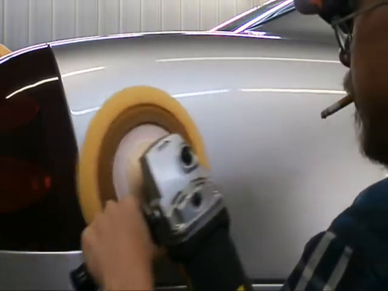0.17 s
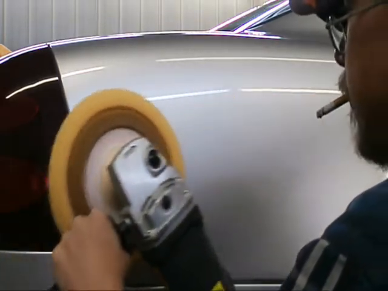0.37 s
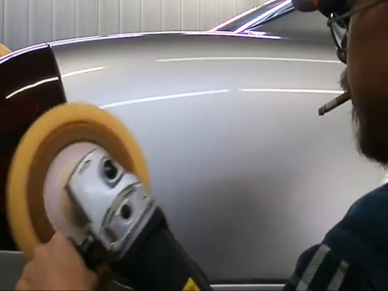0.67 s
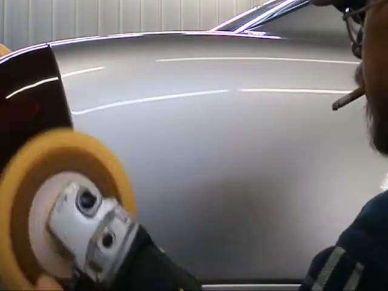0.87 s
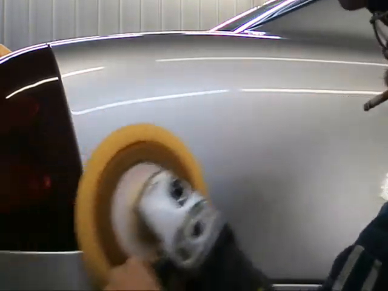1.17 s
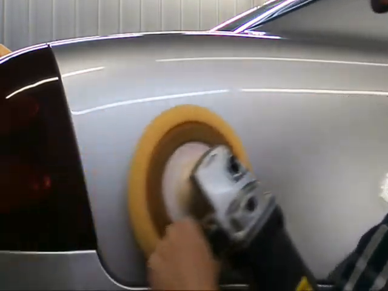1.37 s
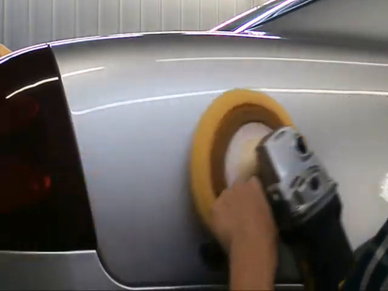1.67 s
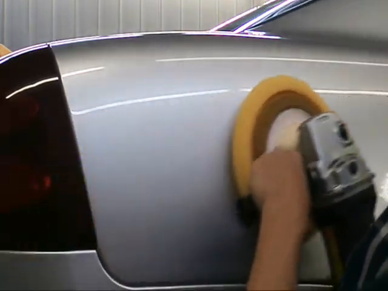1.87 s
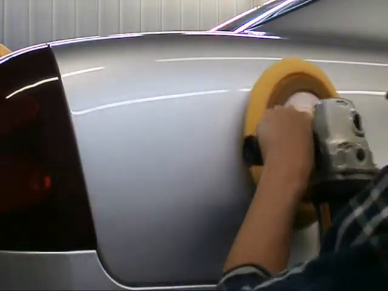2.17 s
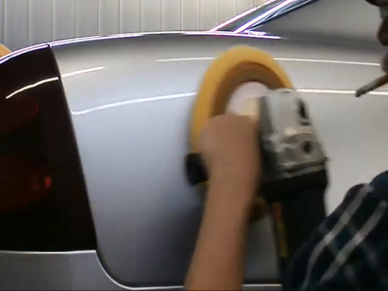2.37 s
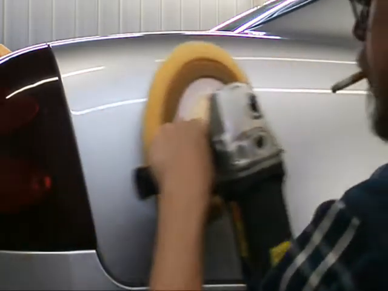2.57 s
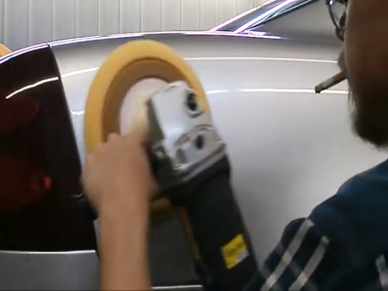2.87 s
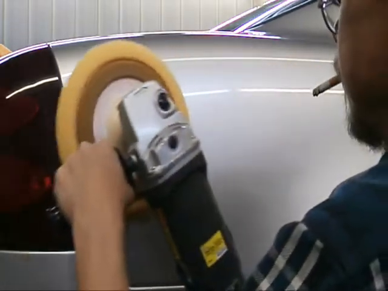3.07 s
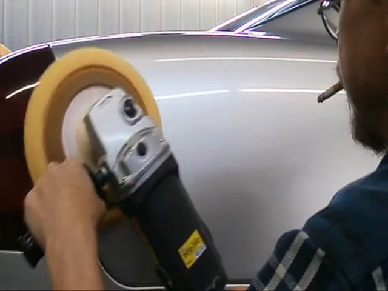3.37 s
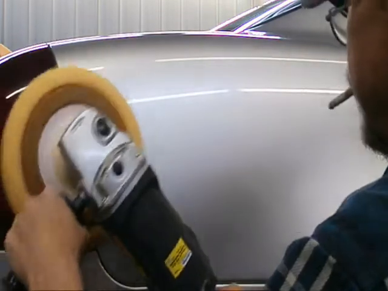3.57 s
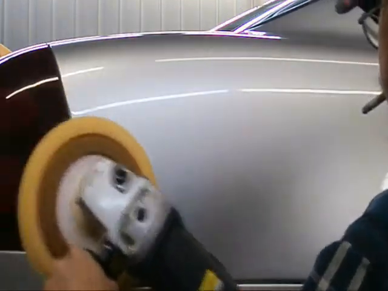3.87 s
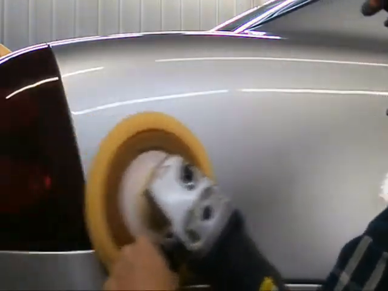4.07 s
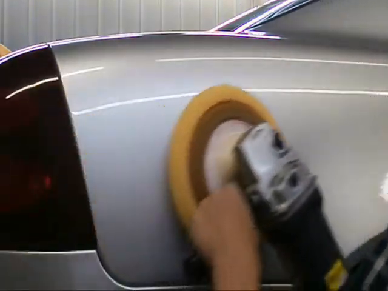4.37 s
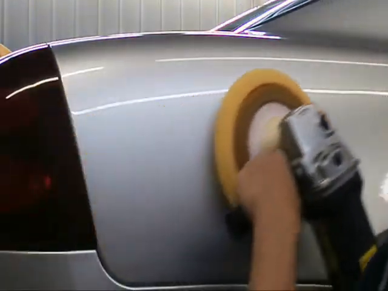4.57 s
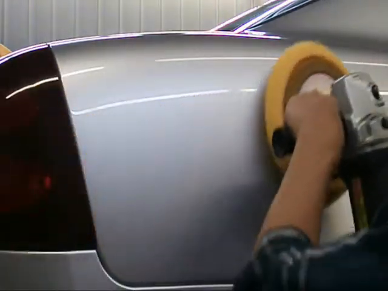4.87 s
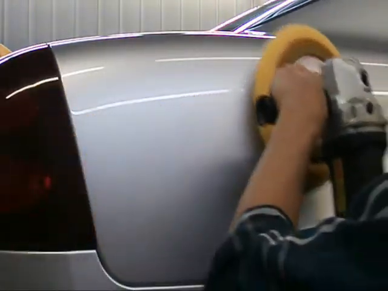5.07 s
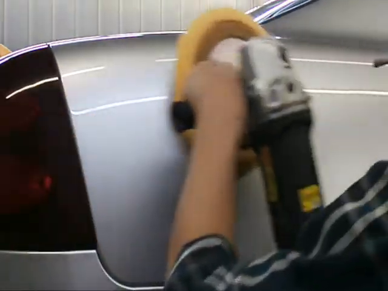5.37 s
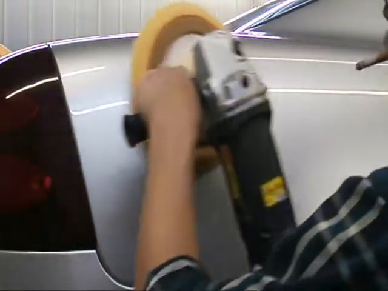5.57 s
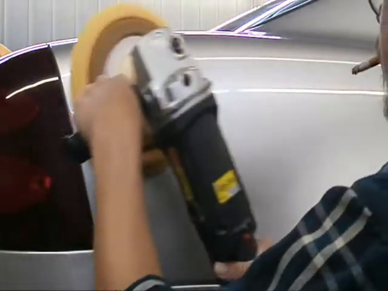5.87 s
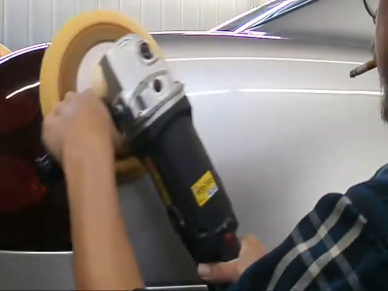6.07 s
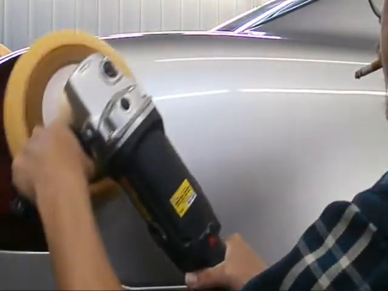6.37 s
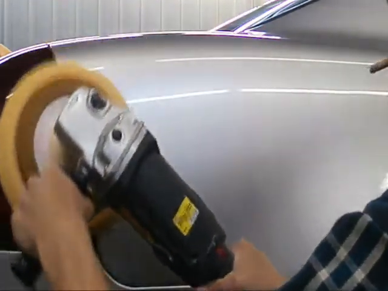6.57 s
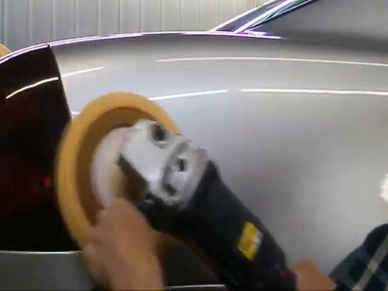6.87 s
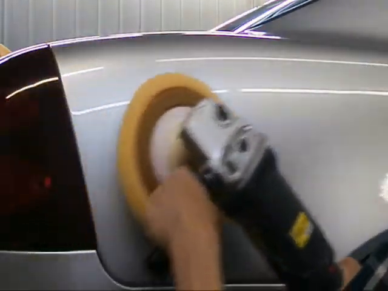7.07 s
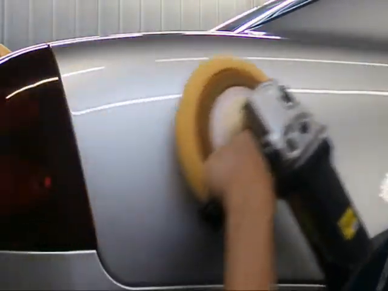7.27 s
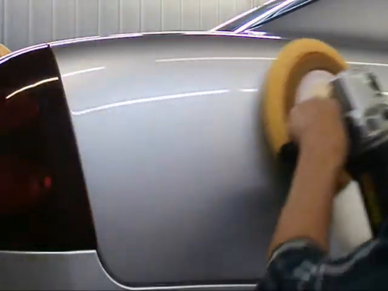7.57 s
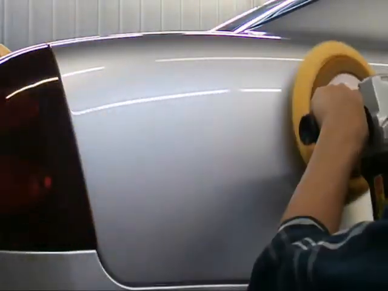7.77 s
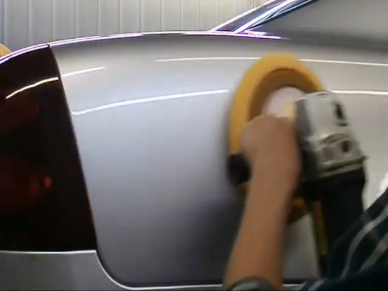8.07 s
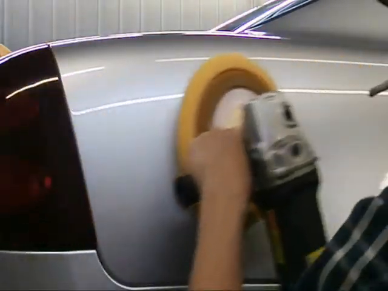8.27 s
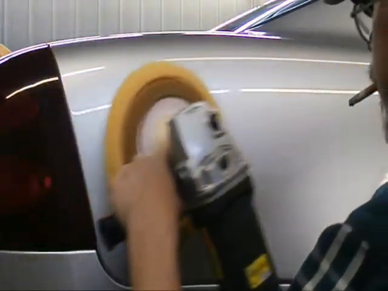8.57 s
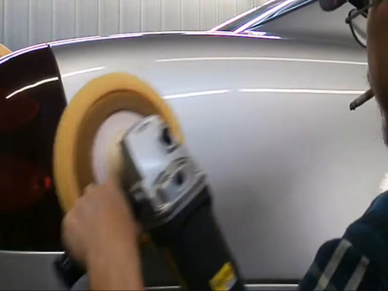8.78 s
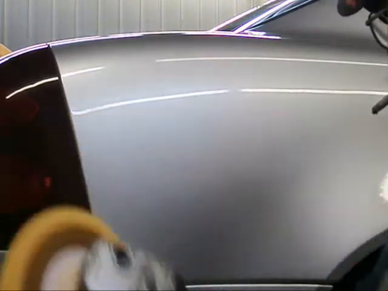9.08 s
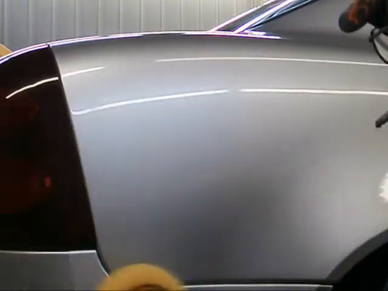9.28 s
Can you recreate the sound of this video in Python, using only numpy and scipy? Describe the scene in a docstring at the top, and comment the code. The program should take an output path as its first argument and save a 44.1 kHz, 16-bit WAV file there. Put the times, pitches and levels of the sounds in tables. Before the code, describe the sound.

From 0 s an electric rotary polisher is already at full running speed, close to a single microphone in a garage. A dense, rough rush of fan air and rubbing pad mixes with gritty gear rattle and a nasal metallic whine near 1.25-1.3 kHz, with shimmering higher overtones. A quick throb of about two dozen soft thuds a second makes it flutter. As the pad laps the car panel, pitch and colour drift: rising slightly around 2 s, sagging by 3-4 s, up near 5 s, lowest and most strained around 6 s, then climbing to its highest near 7.8 s before easing down again. Faint mains buzz and low room rumble lie beneath. At about 9 s the switch is released; the whine drops quickly at first, then glides smoothly downward, its overtones ringing, while the air rush persists. It is still turning when the sound ends at about 9.4 s.

```python
"""In a garage, near one microphone, a rotary polisher already laps over a car panel as the scene opens.
A 6-tooth pinion on the armature drives a 53-tooth wheel on the pad spindle: the mesh whines and uneven
teeth knock in patterns that repeat with each shaft, amid the rush of air and pad, mains hum and room rumble.
A high spot thuds once a wheel turn, and each lap of the pad changes speed and tone.
At 8.97 s the tool is switched off and the whine glides down, still turning when the scene ends."""
import sys
import numpy as np
from scipy import signal
from scipy.fft import rfft, irfft, next_fast_len
from scipy.io import wavfile
from scipy.ndimage import uniform_filter1d, map_coordinates

SR = 44100
rng = np.random.default_rng(int(sys.argv[2]) if len(sys.argv) > 2 else 0)


def volts(x):
    """Linear amplitude factor 10**(x/20) for a level x in dB, scalar or array-like."""
    e = np.asarray(x, float) / 20
    return 10 ** e


def materialize(psi):
    """Save the field psi as 16-bit PCM at rate SR to the path in sys.argv[1].

    A 1-D psi becomes a single channel; in a 2-D psi each row is a channel.
    """
    bounded = np.clip(np.atleast_2d(psi).T, -1, 1)
    quanta = np.round(bounded * 32767).astype(np.int16)
    wavfile.write(sys.argv[1], SR, quanta)


N = 415863
TIME = np.arange(N) / SR  # [s]

PINION_TEETH, WHEEL_TEETH = 6, 53
SPOT_TOOTH = 12  # wheel tooth at the high spot
OFF_S = 8.97  # the switch opens
IDLE_TEETH, FULL_LOAD_DROP = 1315, 100  # unloaded speed, speed lost at load 1 [teeth/s]
SLACK_TEETH, SLACK_S = 32, .05  # quick first loss of speed [teeth/s] and its time constant [s]
COAST_S = 2  # time constant of the slow run-down [s]
TOP_HZ = 15750  # upper limit of the microphone's band

# Motor speed as pressing on the pad slows it, before any run-down: (time [s], speed [teeth/s])
DRIVEN_SPEED = [(0.0, 1275.5), (0.62, 1263.7), (0.96, 1279.4), (1.14, 1279.5), (1.55, 1296.6),
                (2.14, 1310.2), (2.42, 1290.4), (2.9, 1269.9), (3.2, 1253.7), (3.8, 1249.0), (4.2, 1272.0),
                (4.75, 1280.4), (5.06, 1290.4), (5.45, 1244.1), (6.15, 1206.7), (6.72, 1229.8),
                (7.02, 1241.4), (7.5, 1283.0), (7.82, 1316.7), (8.2, 1280.4), (8.8, 1239.3), (8.97, 1246.1)]
# Moments when the pad passes the right end of its oval lap, then rises: (time [s])
LAP_RIGHT_END_S = [-0.28, 2.5, 5, 8, 10]
# Rush level and its additions in two ranges:
# (time [s], level [dB], added between 2.3 and 3.8 kHz [dB], added between 3.8 and 12.6 kHz [dB])
RUSH_LEVEL = [(0, -23.5, 0.5, -1.5), (.5, -25, 1.5, 1), (.8, -25.5, -1.5, 1), (1.5, -25, 2.5, -1),
              (2, -26, -2, -0.5), (2.22, -24.5, -5, 0.5), (2.5, -24, 1.5, 0), (2.8, -24.5, 4, -1.5),
              (3.05, -25.5, -2.5, -1), (3.75, -26, -3, 1.5), (4.3, -24, -2, -3), (4.75, -24.5, 0.5, -0.5),
              (5.1, -24.5, -4, 1), (5.5, -25.5, -2.5, -0.5), (5.9, -26, -5, -2), (6.2, -26.5, -7, -2.5),
              (6.45, -25, -4, -0.5), (6.8, -26.5, -6, -2.5), (7.25, -25, 2.5, -1.5), (7.67, -25, -4, -0.5),
              (8.15, -23, -1.5, 0), (8.85, -24.5, -0.5, -0.5), (9.1, -26, -4, -1), (9.43, -23.5, -10, -4)]
# Which addition each of the six parts takes: (weight of the first [0-1], weight of the second [0-1])
RUSH_SHARE = [(0, 0), (0, 0), (1, 0), (0, 1), (0, 1), (0, 0)]
# Level laws about the rush, rows: panel drone, gear case low, gear case high, vents, fan air, brush hiss:
# (base [dB], added at the lap's right end [dB], at its top [dB], at load 1 [dB], after the switch [dB])
PART_LAWS = [(1, 0, 0.28, -3, -0.5), (2, -1, 0.049, 0.5, -6), (-1, -1.5, -0.045, -1.5, -4),
             (0.5, 0.5, -0.86, 0.5, 0), (-11, -.5, -0.59, 0.5, 2.5), (-10, -4, 0.61, 0, 1)]
# Borders between those six parts: (frequency [Hz])
PART_BORDERS_HZ = [1350, 2300, 3800, 7600, 12600]
# Casing colour below 3300 Hz, only its shape within a part matters: (frequency [Hz], relative density [dB/Hz])
CASING_COLOUR = [(76, -47), (130, -20.5), (161, -21), (229, -15), (335, -14.5), (808, -3.5), (912, -6),
                 (1230, -5), (1550, -12.5), (2480, 4), (2880, 7.5), (3300, -0.5), (4290, -40), (7260, -120)]
# Vent colour from 3300 Hz up, likewise a shape: (frequency [Hz], relative density [dB/Hz])
VENT_COLOUR = [(3300, 8), (3960, 2), (4200, -1.5), (4550, -8.5), (5010, -4.5), (6300, -7), (7560, -14.5),
               (8200, -19.5), (10100, -22.5), (11200, -20.5), (12400, -23.5), (13300, -20), (13800, -11),
               (15700, -13)]
# Knocks of the wheel's teeth over the rush: (frequency [Hz], level [dB])
WHEEL_KNOCKS = [(300, -8), (900, -2.5), (1200, 1.5), (1600, -4), (2500, 1.5), (3200, -4), (7000, -12)]
# Knocks of the pinion's teeth over the rush: (frequency [Hz], level [dB])
PINION_KNOCKS = [(500, -12), (2000, -7), (5000, -6), (9000, -6), (14000, -7)]
# Throb of each part with the spindle: (part [0-5], times a turn, depth [0-1], tooth at the peak)
SPINDLE_THROB = [(0, 1, .11, 17), (0, 2, .05, 15), (1, 4, .14, 11.5), (1, 2, .06, 10), (2, 1, .17, 47),
                 (2, 2, .1, 17), (2, 4, .08, 9), (3, 2, .04, 11)]
# Resonance between tool and panel: (time [s], frequency [Hz])
PANEL_RIDGE = [(0, 2510), (.26, 2330), (1.4, 2750), (2.26, 2930), (2.78, 2400), (3.73, 2430), (4.28, 2770),
               (5, 2640), (6.33, 2010), (7.3, 2720), (7.77, 2780), (8.51, 2550), (8.93, 2720), (9.43, 2150)]
# Armature tones at one and four times a turn, a row each:
# (base [dB], added at the lap's right end [dB], at its top [dB], at load 1 [dB], after the switch [dB])
ARMATURE_LAWS = [(-46, 4, 3, -8, 6), (-49, 2, 0, 10, -8)]
# Mesh tone and its octave before swell and flicker: (time [s], mesh level [dB], octave level [dB])
MESH_LEVEL = [(0, -41, -38), (.2, -28, -38), (.45, -24, -27), (.7, -28, -30), (.96, -31, -26),
              (1.12, -32, -35), (1.36, -31, -26), (1.65, -30, -35), (1.9, -38, -31), (2.08, -43, -22),
              (2.3, -44, -19), (2.38, -24, -23), (2.6, -25, -28), (2.72, -27, -35), (2.88, -24, -22),
              (3.2, -28, -28), (3.5, -28, -29), (3.9, -31, -32), (4.16, -26, -22), (4.45, -34, -38),
              (4.75, -46, -24), (5.2, -33, -25), (5.4, -31, -19), (5.5, -24, -18), (5.65, -24, -19.5),
              (5.8, -27, -18), (6.1, -25, -20), (6.25, -24.5, -23), (6.4, -26, -26), (6.62, -24.5, -21),
              (7.1, -28, -26), (7.36, -31, -38), (7.65, -47, -25), (8.1, -33, -28), (8.32, -30, -21),
              (8.5, -28, -32), (8.75, -33, -26), (8.93, -29, -30), (9.03, -31, -21), (9.12, -50, -23),
              (9.22, -42, -22), (9.29, -39, -27), (9.36, -33, -22), (9.43, -34, -30)]
# Third multiple of the mesh, likewise: (time [s], level [dB])
THIRD_LEVEL = [(0, -47), (.3, -27.5), (.65, -43), (.95, -27), (1.2, -33), (1.45, -33), (1.8, -42),
               (2.05, -31), (2.3, -30), (2.5, -48), (3.05, -42), (3.35, -44), (4.15, -35), (4.5, -46),
               (5.3, -39), (5.6, -46), (6.55, -37), (6.9, -48), (7.35, -34), (7.55, -43), (8, -33),
               (8.3, -48), (8.5, -33), (9.05, -50), (9.43, -50)]
# Fourth multiple of the mesh, likewise: (time [s], level [dB])
FOURTH_LEVEL = [(0, -47), (.5, -40), (1.2, -47), (2.2, -48), (2.45, -37), (2.65, -43), (2.9, -34),
                (3.2, -37), (4, -36), (4.25, -48), (5.55, -46), (5.8, -38), (6.3, -42), (6.85, -35),
                (7.25, -33), (7.55, -44), (8.1, -42), (8.4, -32), (8.85, -39), (9.05, -52), (9.43, -44)]
# Fifth and sixth multiples: (multiple of the mesh, law with the armature rows' five columns [dB])
OVERTONE_LAWS = [(5, (-43.5, 9, -1, -8, 0)), (6, (-43.5, 1.5, -0.5, 3, -1.5))]
# Faint higher multiples while driven: (multiple of the mesh, middle level [dB rms])
UPPER_TONES = [(7, -54), (8, -55), (9, -57), (10, -62), (11, -59), (12, -57)]
# Ring that the sixth multiple glides through after the switch: (frequency [Hz], added level [dB])
GLIDE_RING = [(5750, 19), (5950, 21), (6150, 6), (6300, 4), (6650, 12), (6900, 8), (7200, -3)]
# Buzz at multiples of twice the mains: (frequency [Hz], middle level [dB rms])
MAINS_BUZZ = [(120, -54.5), (240, -51), (360, -56), (480, -45.5)]
# Colour of the room's rumble, only its shape matters: (frequency [Hz], relative density [dB/Hz])
GARAGE_COLOUR = [(30, -16), (50, -8), (80, 5.5), (110, -1.5), (160, -14), (300, -48)]
# Level of the high spot's thuds: (time [s], level [dB])
THUD_LEVEL = [(0, -28), (1.1, -32), (1.55, -38), (2.3, -37), (2.7, -30), (4.1, -32), (4.6, -37),
              (5.65, -35), (6.05, -50), (6.4, -50), (6.8, -36), (7.55, -42), (8.4, -31), (8.7, -31),
              (9.1, -40)]


def unit(x):
    """Brings a layer to rms 1."""
    return x / np.sqrt(np.mean(x ** 2) + 1e-20)


def along(points, hz):
    """Interpolates (Hz, value) points on a log axis."""
    f, v = np.transpose(points)
    return np.interp(np.log(hz + 1), np.log(f + 1), v)


def curves(rows):
    """One value per sample for each column after the time."""
    s, *cols = np.transpose(rows)
    return [np.interp(TIME, s, c) for c in cols]


def wobble(rate):
    """A smooth random curve, rate knots a second."""
    coarse = TIME[::32]
    knots = rng.standard_normal(500)
    return np.interp(TIME, coarse, map_coordinates(knots, [coarse * rate]))


def filtered(x, response):
    """x times a complex response of frequency."""
    m = next_fast_len(N + SR // 2)
    spectrum = rfft(x, m) * response(np.fft.rfftfreq(m, 1 / SR))
    return irfft(spectrum, m)[..., :N]


def motor_speed():
    """Teeth a second: set by the load while driven, dying away after the switch."""
    since_off = np.clip(TIME - OFF_S, 0, None)
    slack = SLACK_TEETH * (1 - np.exp(-since_off / SLACK_S))
    return (curves(DRIVEN_SPEED)[0] - slack) * np.exp(-since_off / COAST_S)


def handling():
    """Rows that the level laws weigh: one, how far right, how high, load, switched off."""
    lap = 2 * np.pi * np.interp(TIME, LAP_RIGHT_END_S, np.arange(len(LAP_RIGHT_END_S)))
    load = (IDLE_TEETH - curves(DRIVEN_SPEED)[0]) / FULL_LOAD_DROP
    off = np.clip((TIME - OFF_S) / 0.16, 0, 1)
    return np.array([np.ones(N), np.cos(lap), np.sin(lap), load, off])


def knocks(teeth_passed, count, memory_turns, jitter):
    """One knock per tooth; each tooth keeps its own size, which drifts over some turns."""
    tooth = np.arange(1, int(teeth_passed[-1]))
    sizes = rng.standard_normal((2000, count))
    size = map_coordinates(sizes, [tooth / count / memory_turns, tooth % count], order=1)
    moment = tooth + jitter * rng.standard_normal(len(tooth))
    at = np.interp(moment, teeth_passed, np.arange(N))
    # a windowed sinc sets each knock between samples
    near = np.floor(at)[:, None] + np.arange(-7, 9)
    offset = near - at[:, None]
    kernel = np.sinc(offset) * np.cos(np.pi * offset / 16) ** 2
    index = np.clip(near, 0, N - 1).astype(int)
    return unit(np.bincount(index.ravel(), (size[:, None] * kernel).ravel(), N))


def ringing(x, t60):
    """The metal case and the panel smear each knock in time without colouring it."""
    t = np.arange(SR // 4) / SR
    tail = volts(-60 * t / t60) * rng.standard_normal(len(t))
    phase_only = lambda hz: np.exp(1j * np.angle(rfft(tail, 2 * len(hz) - 1)))
    return filtered(x, phase_only)


def sweeping(x, patchy_db, ridge_db, width_hz):
    """Echoes off the curved panel shift as the tool moves: a ridge slides and bands fade in and out."""
    hz, t, z = signal.stft(x, SR, nperseg=512)
    field = uniform_filter1d(rng.standard_normal(z.shape), size=5, axis=0)
    field = uniform_filter1d(field, size=70, axis=1)
    treble = (hz / (hz + 3000))[:, None]  # short waves are scattered most
    ridge_hz = np.interp(t, *np.transpose(PANEL_RIDGE))
    ridge = np.exp(-((hz[:, None] - ridge_hz) / width_hz) ** 2)
    gain_db = patchy_db * unit(field) * treble + ridge_db * ridge
    return signal.istft(z * volts(gain_db), SR, nperseg=512)[1][:N]


def six_parts(source):
    """Colours the source by casing and vents, then splits it into six overlapping frequency ranges."""
    colour = lambda hz: volts(np.where(hz < 3300, along(CASING_COLOUR, hz), along(VENT_COLOUR, hz) - 11))
    # 0 in the lowest part, 5 in the highest
    place = lambda hz: sum(1 / (1 + (edge / (hz + 1)) ** 12) for edge in PART_BORDERS_HZ)
    parts = np.arange(len(PART_BORDERS_HZ) + 1)[:, None]
    return filtered(source, lambda hz: colour(hz) * np.clip(1 - abs(place(hz) - parts), 0, 1))


def rattle(teeth_passed, hands):
    """Air and pad rush plus tooth knocks, through the casing, in six parts that face the microphone in turn."""
    wheel = knocks(teeth_passed, count=WHEEL_TEETH, memory_turns=15, jitter=.01)
    pinion = knocks(teeth_passed, count=PINION_TEETH, memory_turns=120, jitter=.008)
    teeth = filtered(wheel, lambda hz: volts(along(WHEEL_KNOCKS, hz)))
    teeth += filtered(pinion, lambda hz: volts(along(PINION_KNOCKS, hz)))
    # torque pulses at twice the mains, until the switch opens
    ripple = 1 + 0.019 * (TIME < OFF_S) * np.cos(2 * np.pi * MAINS_BUZZ[0][0] * TIME)
    knocking = ripple * (rng.standard_normal(N) + ringing(teeth, t60=.01))
    fan_air = filtered(rng.standard_normal(N), lambda hz: .8 / (1 + (3500 / (hz + 1)) ** 2))
    source = sweeping(knocking + fan_air, patchy_db=2.5, ridge_db=3.5, width_hz=220)
    split = six_parts(source)
    throb = np.ones(split.shape)
    for part, times, depth, tooth in SPINDLE_THROB:
        throb[part] += depth * np.cos(2 * np.pi * times * (teeth_passed - tooth) / WHEEL_TEETH)
    level_db, *added_db = curves(RUSH_LEVEL)
    parts_db = level_db + np.dot(RUSH_SHARE, added_db) + PART_LAWS @ hands
    return sum(volts(db + 0.55 * wobble(9)) * unit(part) for db, part in zip(parts_db, throb * split))


def armature(teeth_passed, hands):
    """Two sines locked to the armature: its unbalance once a turn, and a tone four times a turn."""
    turn = 2 * np.pi * teeth_passed / PINION_TEETH
    unbalance_db, four_db = ARMATURE_LAWS @ hands
    unbalance = volts(unbalance_db + 1.5 * wobble(5)) * np.sin(turn)
    four_a_turn = volts(four_db + 3 * wobble(4)) * np.sin(4 * turn + .4 * wobble(30))
    return np.sqrt(2) * (unbalance + four_a_turn)


def mesh_whine(teeth_passed, speed, hands):
    """Multiples of the tooth rate; the wheel's runout swells and bends them, less so after the switch."""
    off = hands[-1]
    drive = 1 - .55 * off
    # spindle angle, counted from a tooth
    angle = lambda tooth: 2 * np.pi * (teeth_passed - tooth) / WHEEL_TEETH
    bend = .7 * np.cos(angle(17))  # [rad]
    fundamental_swell = .6 * np.cos(angle(18)) + .12 * np.cos(4 * angle(7.5))
    overtone_swell = .3 * hands[3] ** 2 * np.cos(angle(19))  # grows with the load
    overtone_swell += .15 * np.cos(2 * angle(12)) + .3 * np.cos(4 * angle(8))
    # the fifth and sixth rise and fall with the lap, the load and the switch, and waver at random, less after
    # the switch
    levels_db = {k: law @ hands + 3 * drive * wobble(5) for k, law in OVERTONE_LAWS}
    levels_db[6] += off * along(GLIDE_RING, 6 * speed)
    levels_db.update(zip((1, 2, 3, 4), curves(MESH_LEVEL) + curves(THIRD_LEVEL) + curves(FOURTH_LEVEL)))
    tones = np.zeros(N)
    for k, db in levels_db.items():
        swell = 1 + drive * (fundamental_swell if k == 1 else overtone_swell)
        rough = .065 * k * (k + 1) * wobble(40)  # [rad]
        flicker = volts((.5 + .45 * k) * drive * wobble(16))
        phase = 2 * np.pi * k * teeth_passed + drive * (bend + rough)
        tones += volts(db) * flicker * swell * np.sin(phase)
    for k, db in UPPER_TONES:  # faint, coming and going
        level = volts(db - 8 * off + 5 * wobble(2.5))
        tones += level * np.sin(2 * np.pi * k * teeth_passed + 1.5 * wobble(40))
    return np.sqrt(2) * tones  # sine peak for an rms level


def hum():
    """A buzz of sines at multiples of twice the mains, wavering slightly and going on after the switch."""
    tone = lambda hz: np.sqrt(2) * np.sin(2 * np.pi * hz * TIME)
    return sum(volts(db + 0.95 * wobble(2.7)) * tone(hz) for hz, db in MAINS_BUZZ)


def rumble():
    """The garage's low murmur of air: filtered noise, slowly wavering."""
    noise = filtered(rng.standard_normal(N), lambda hz: volts(along(GARAGE_COLOUR, hz)))
    return volts(-52 + 1.1 * wobble(1.0)) * unit(noise)


def high_spot(teeth_passed):
    """One spot on the wheel binds once a turn: a short thud whose pitch falls from the mesh tone."""
    half = WHEEL_TEETH / 2
    past = (teeth_passed - SPOT_TOOTH + half) % WHEEL_TEETH - half  # teeth since the spot
    turn = ((teeth_passed - past) // WHEEL_TEETH).astype(int) + 1
    size = volts(1.5 * rng.standard_normal(400))[turn]  # each turn has its own strength
    thud = np.exp(-(past / 2.8) ** 2) * np.cos(2 * np.pi * (.8 * past - .025 * past ** 2))
    return volts(curves(THUD_LEVEL)[0]) * unit(size * thud)


def scene():
    """The polisher in the garage, alike on both channels."""
    speed = motor_speed()
    teeth_passed = np.cumsum(speed) / SR
    hands = handling()
    tool = rattle(teeth_passed, hands)
    tool += armature(teeth_passed, hands) + mesh_whine(teeth_passed, speed, hands)
    tool += hum() + rumble() + high_spot(teeth_passed)
    return np.array([tool, tool])


def low_pass(x):
    """Removes everything above the highest recorded frequency."""
    return signal.sosfilt(signal.butter(12, 16420, fs=SR, output="sos"), x)


def record(dry):
    """The microphone's band limit and the converter's small constant offset."""
    band_limited = filtered(dry, lambda hz: hz < TOP_HZ)
    return low_pass(band_limited - .0055)


dry = scene()
out = record(dry)
materialize(out)
```